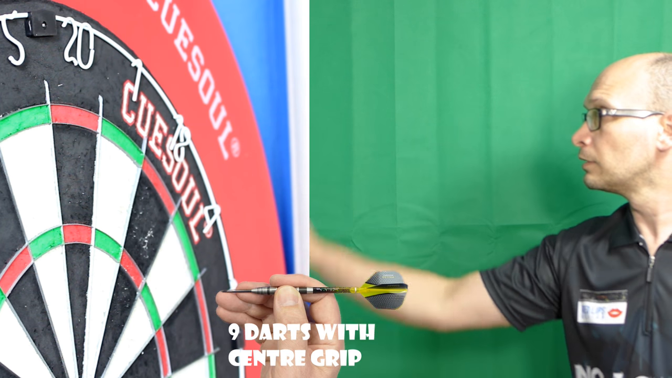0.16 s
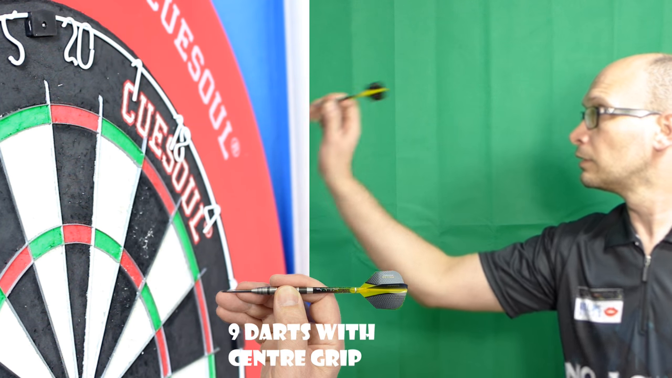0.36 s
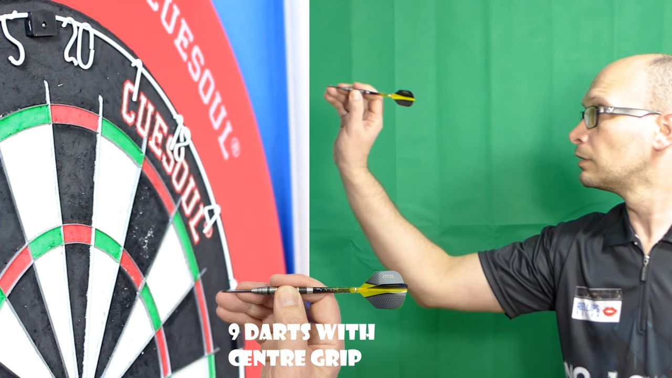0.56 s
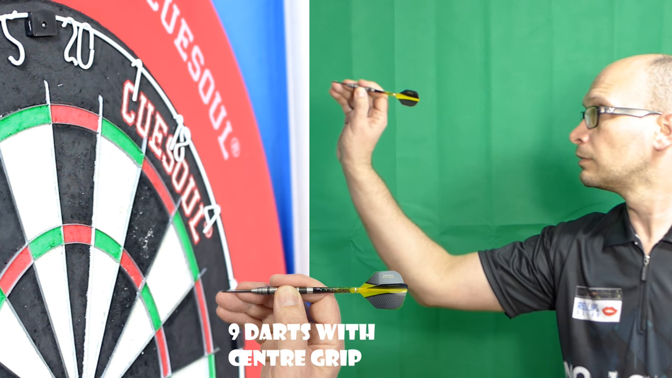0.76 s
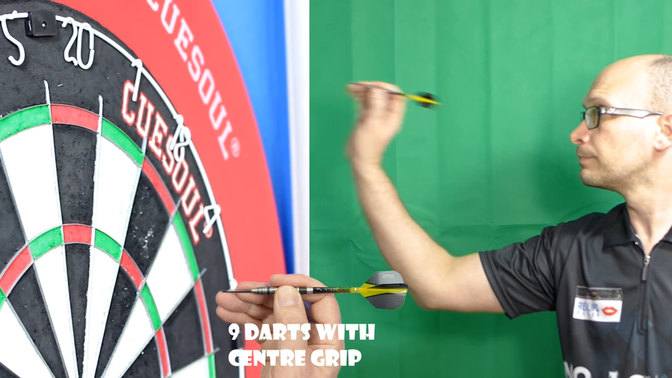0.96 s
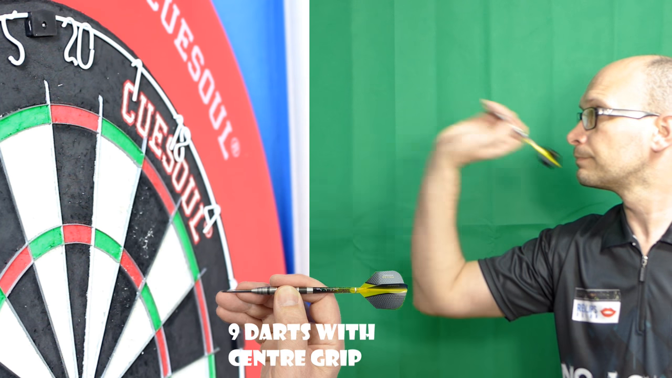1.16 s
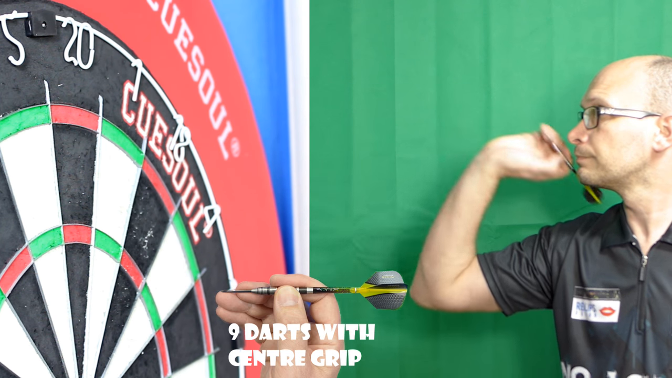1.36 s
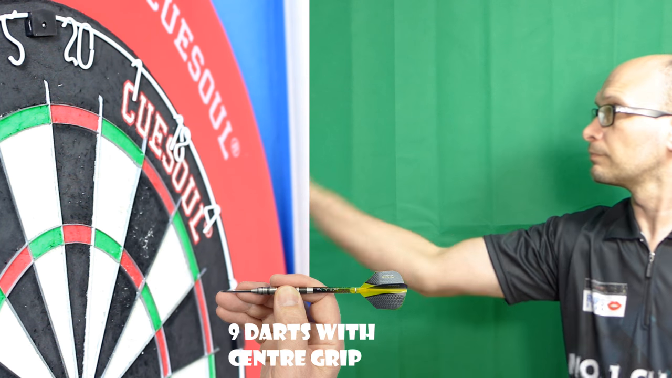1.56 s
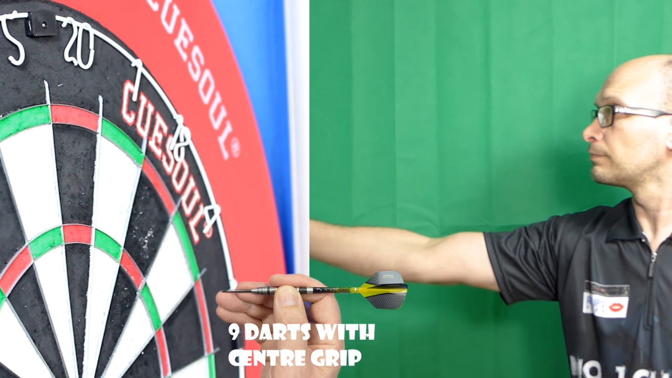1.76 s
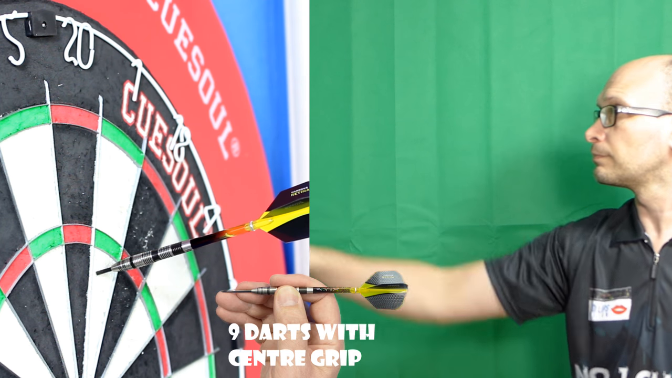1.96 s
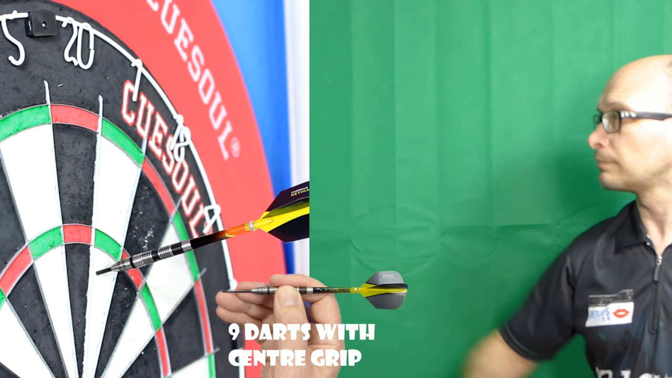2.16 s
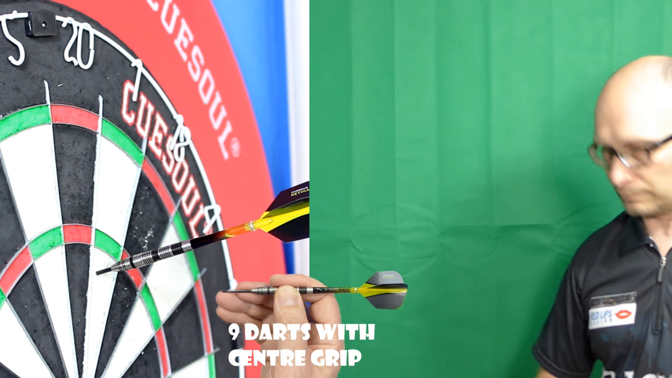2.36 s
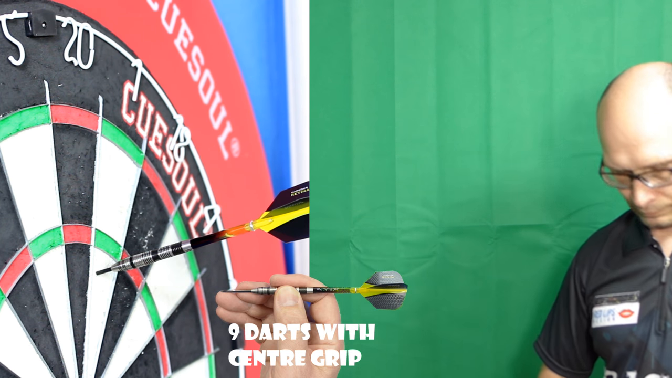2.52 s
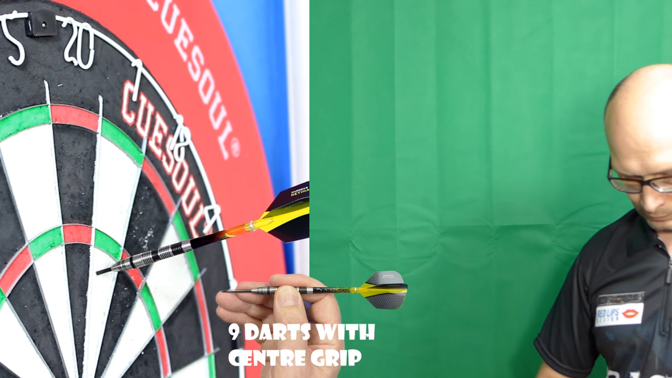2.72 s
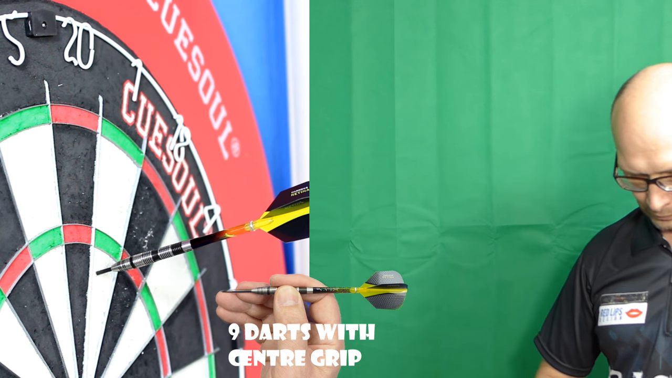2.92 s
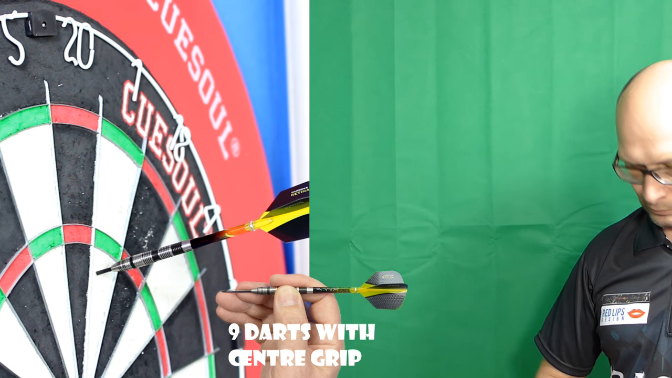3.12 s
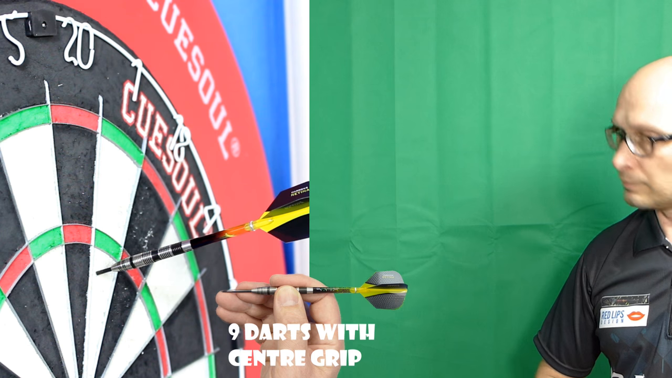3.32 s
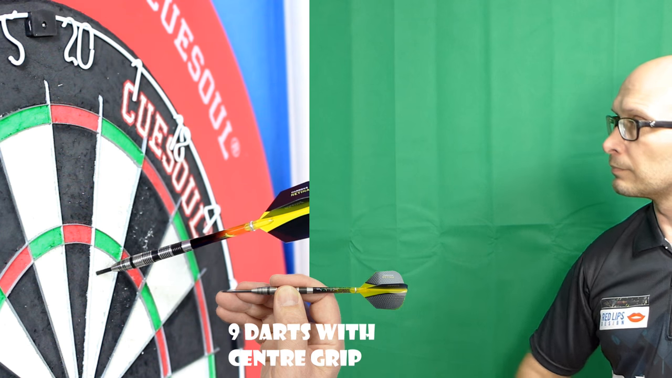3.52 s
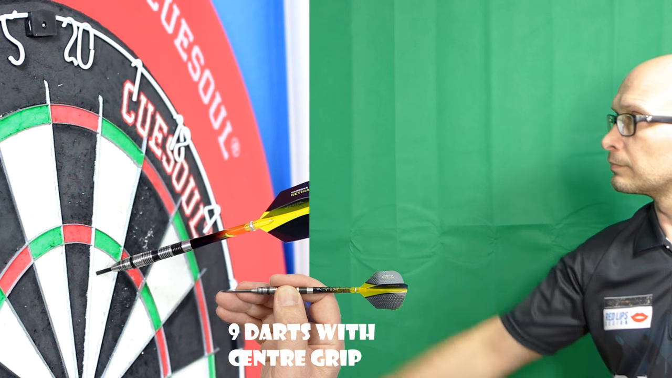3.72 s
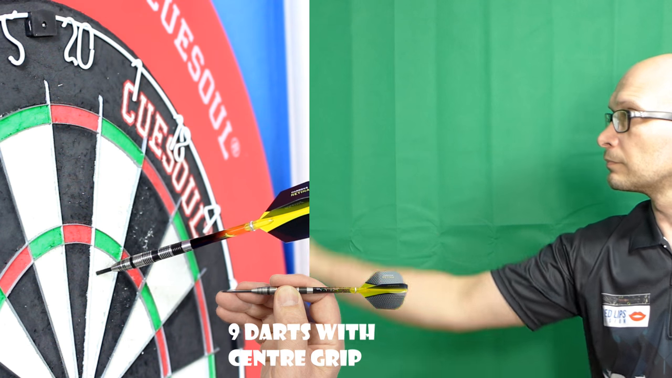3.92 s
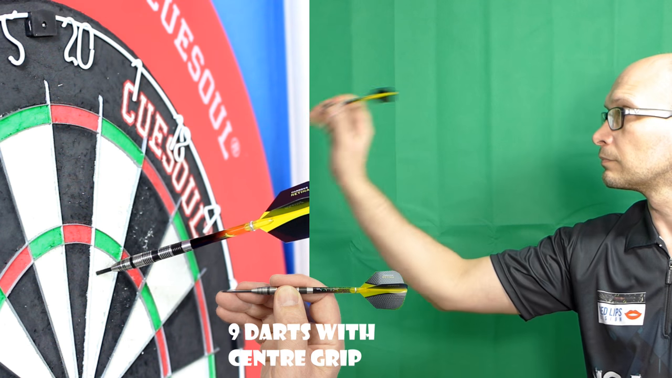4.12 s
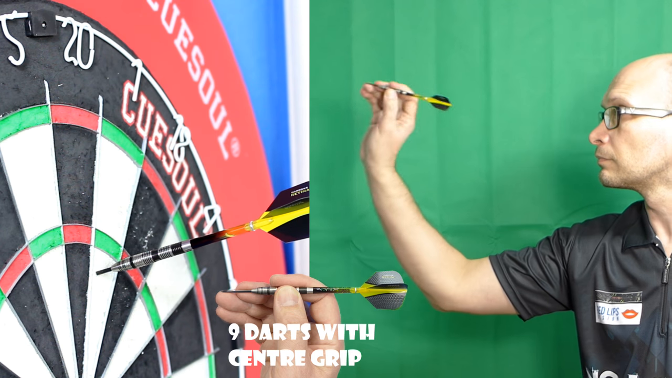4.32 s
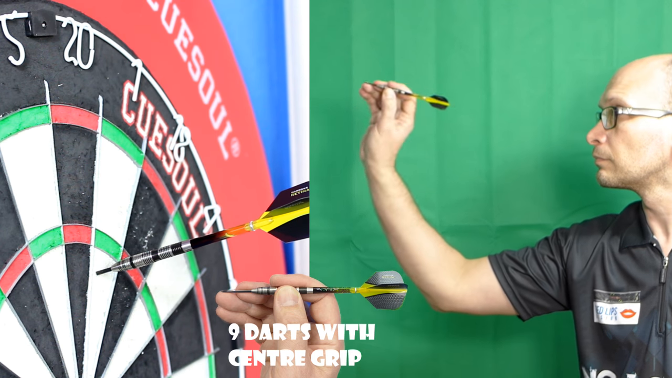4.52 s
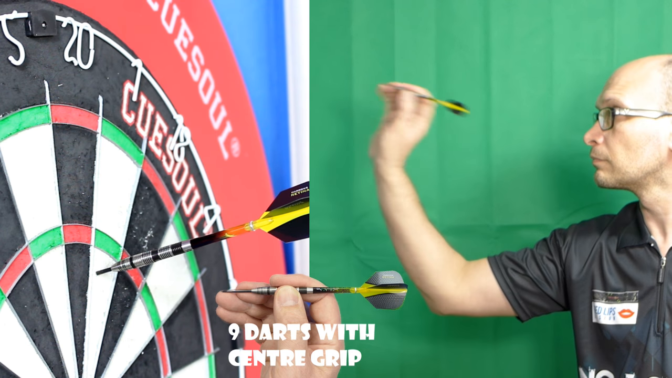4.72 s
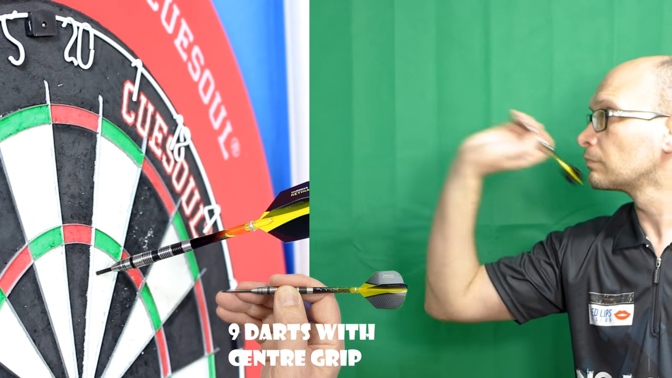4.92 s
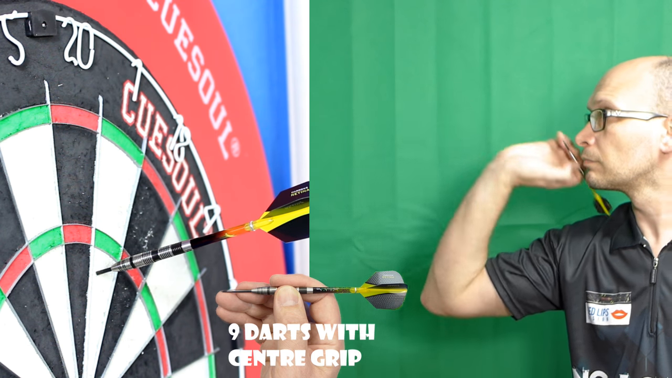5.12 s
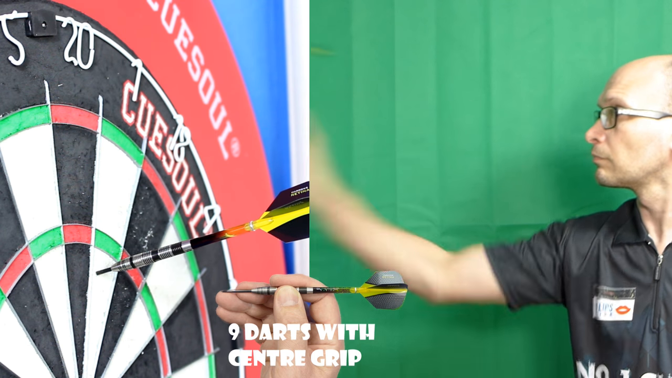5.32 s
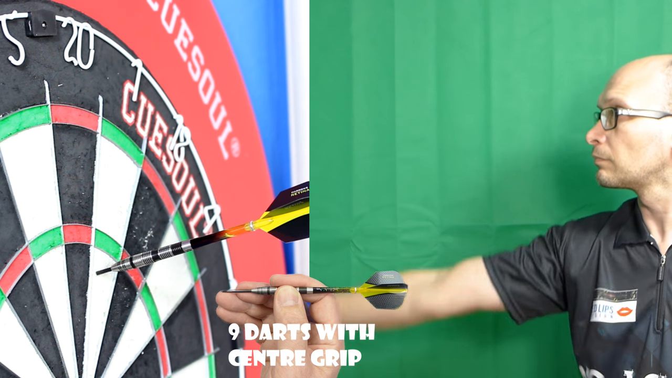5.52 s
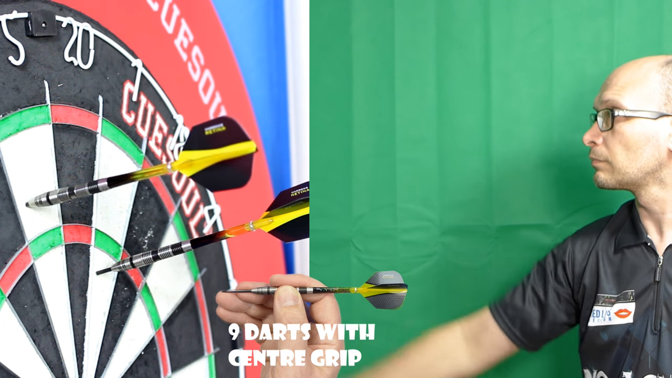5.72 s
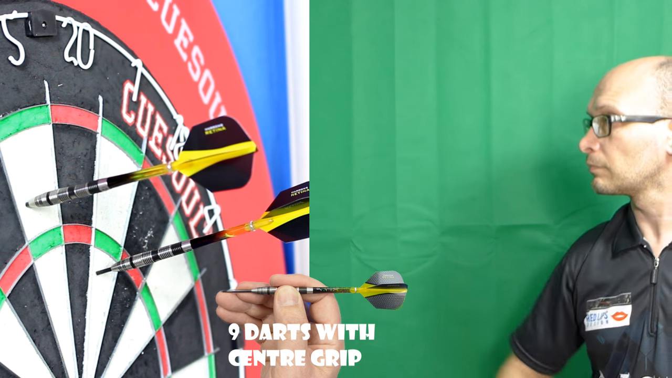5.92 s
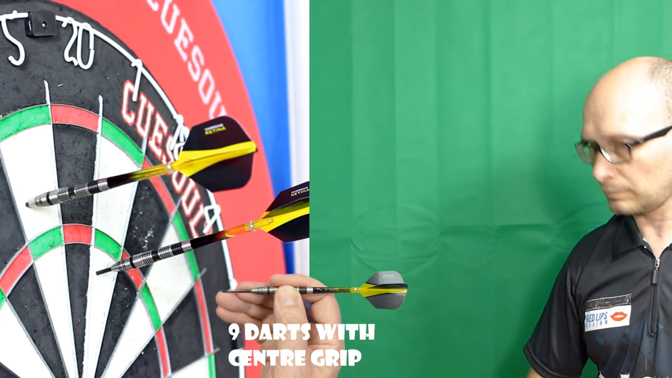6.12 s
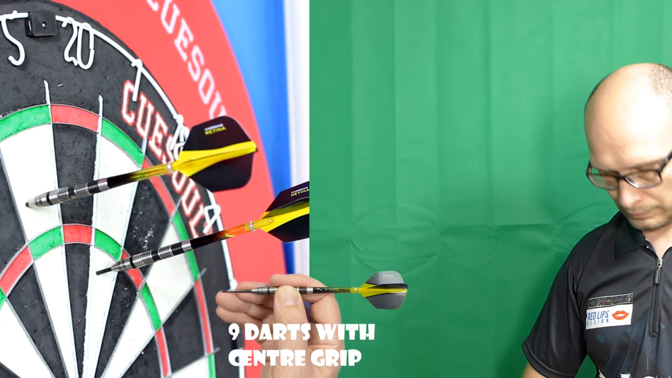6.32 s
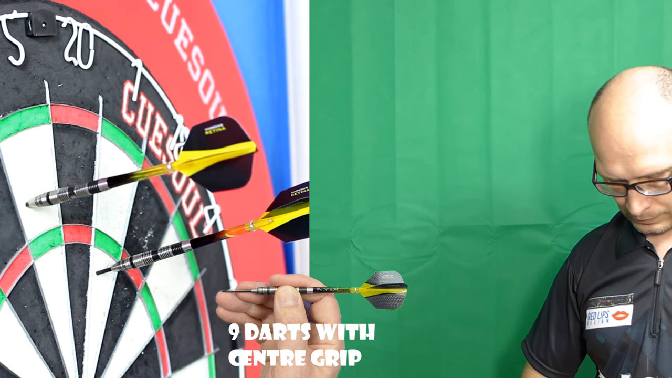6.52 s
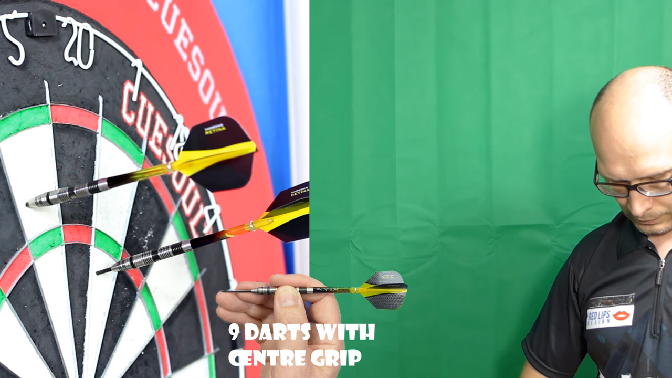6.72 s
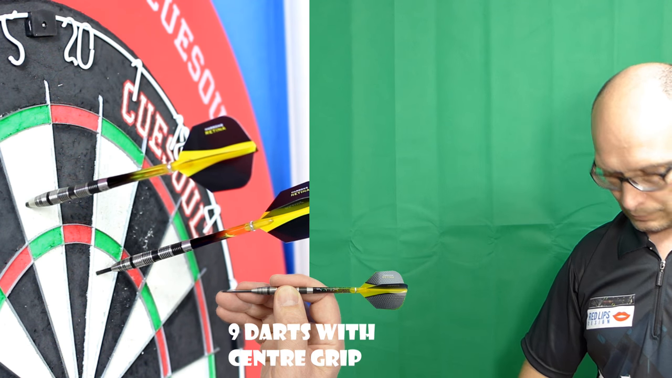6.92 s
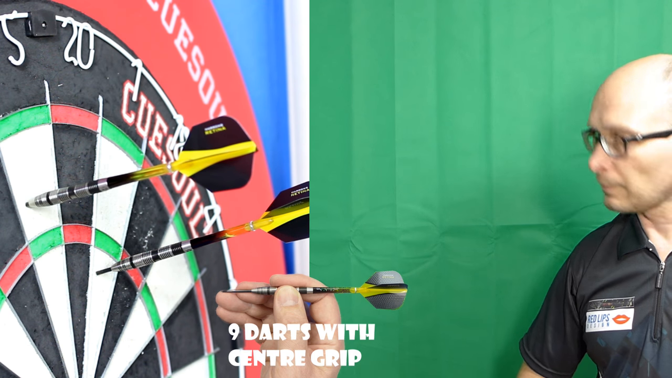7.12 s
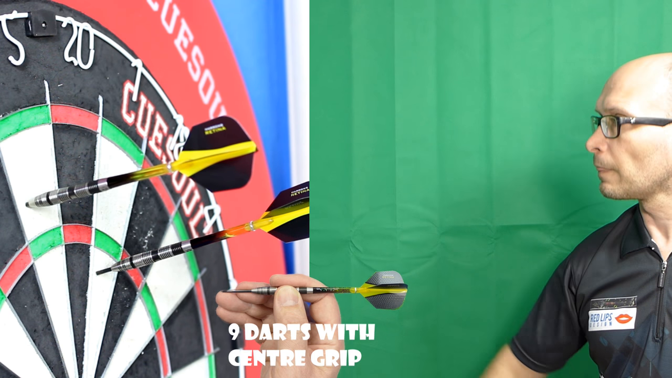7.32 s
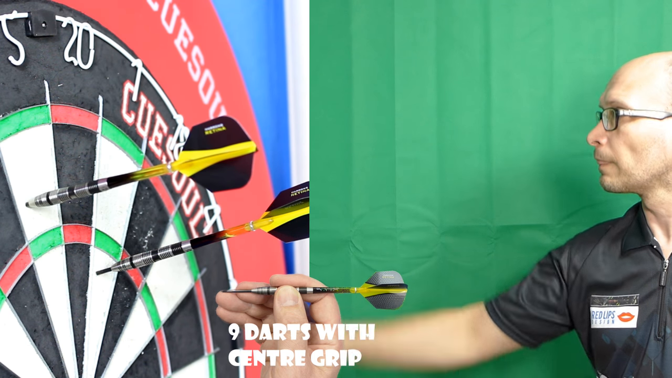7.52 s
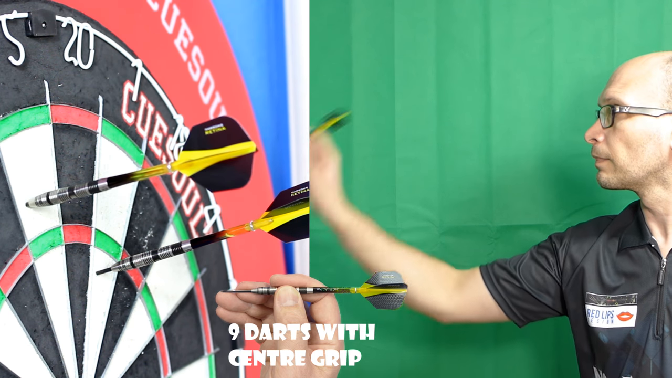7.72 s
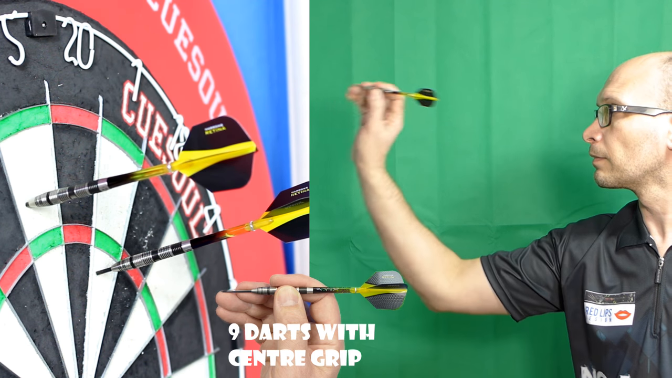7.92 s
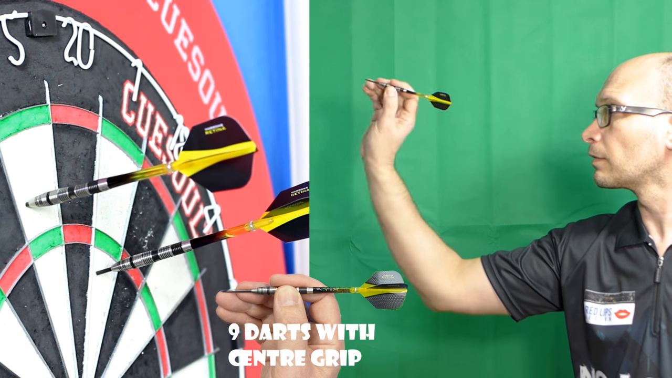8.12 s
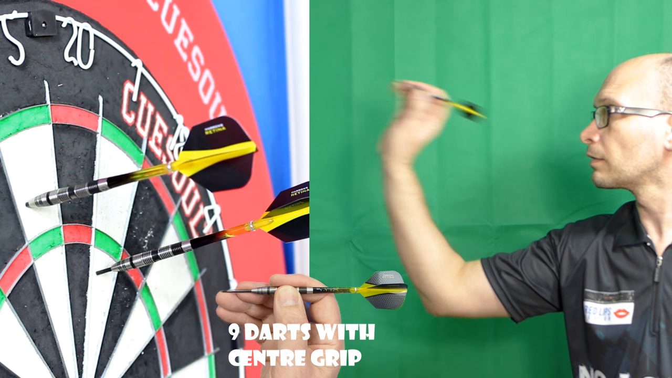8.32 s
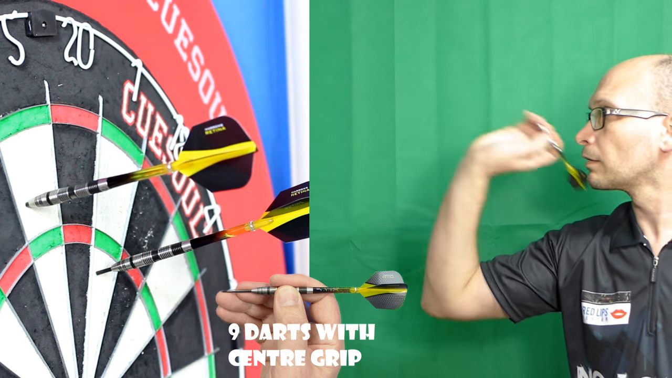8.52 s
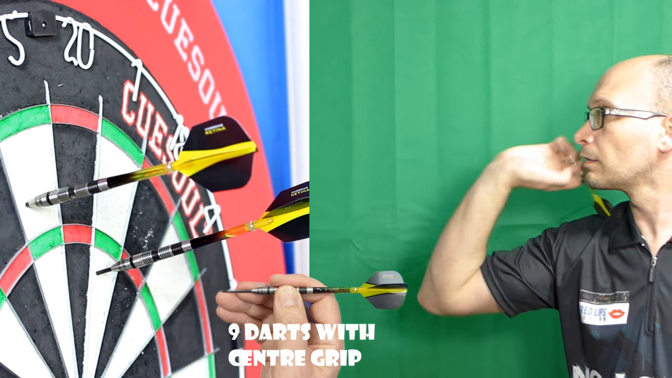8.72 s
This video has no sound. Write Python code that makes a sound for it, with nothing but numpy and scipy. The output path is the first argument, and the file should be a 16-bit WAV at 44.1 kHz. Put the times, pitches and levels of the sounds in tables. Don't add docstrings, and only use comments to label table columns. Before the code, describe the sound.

Close to a stereo camera microphone, cloth rustles gently over steady airy hiss. A dry scratch and sharp flick precede a resonant knock of a dart into a board, with short fluttering reflections off the walls. After quiet shuffling the sequence repeats, the second hit a little louder and brighter. Faint metal clicks and cloth tugs follow, ending on another soft bristly scrape.

```python
import sys
import numpy as np
from scipy import signal
from scipy.fft import rfft, irfft
from scipy.io import wavfile
from scipy.ndimage import uniform_filter1d

SR = 44100
rng = np.random.default_rng(int(sys.argv[2]) if len(sys.argv) > 2 else 0)


def generate_wav(sig):
    pcm = np.round(np.clip(np.atleast_2d(sig).T, -1, 1) * 32767).astype(np.int16)
    wavfile.write(sys.argv[1], SR, pcm)


def amplitude_ratio(level_db):
    exponent = np.asarray(level_db, float) / 20
    return 10 ** exponent


N = 386448
T = np.arange(N) / SR

# (frequency [Hz], level [dB])
ROOM_WIDTH = [(60, -23), (110, -8), (200, -41), (380, -30), (700, -17), (1290, -7), (2380, -9.5),
              (4400, -6), (8120, -5.5), (15000, 1)]


def on_log(hz, table):
    f, v = np.transpose(table)
    return np.interp(np.log(hz + 1), np.log(f + 1), v)


def unit(x):
    return x / np.sqrt(np.mean(x ** 2))


def colour(x, table):
    n = x.shape[-1]
    gain = amplitude_ratio(on_log(np.arange(n // 2 + 1) * SR / n, table))
    return irfft(rfft(x) * gain, n)


def band(x, hz, width_hz, order=2):
    edges = [max(hz - width_hz / 2, 20), min(hz + width_hz / 2, .45 * SR)]
    return signal.sosfilt(signal.butter(order, edges, "bandpass", fs=SR, output="sos"), x)


def walk(rate):
    hold = int(SR / rate)
    levels = np.repeat(rng.standard_normal(N // hold + 1), hold)
    slewed = uniform_filter1d(uniform_filter1d(levels, hold), hold)
    return unit(slewed[:N])


def ring(modes, rise_s, scatter=0):
    t, out = T[:SR], 0
    for (hz, db, t60), turn in zip(modes, scatter * rng.random(len(modes))):
        out = out + amplitude_ratio(db) * np.sin(2 * np.pi * (hz * t + turn)) * 1000. ** (-t / t60)
    return out * (1 - np.exp(-t / rise_s))


def add(out, x, s):
    i = int(s * SR)
    out[..., i:i + x.shape[-1]] += x[..., :N - i]


def darts(hall):
    # (time [s], blow level [dB], fibre crack level [dB], left minus right [dB], brightness [dB])
    landings = [
        (1.879, -14, -39, .5, 2),
        (5.671, -11, -41.5, 0.5, 5.5),
    ]
    # (frequency [Hz], level [dB], t60 [s])
    first_spot = [(280, -23, 0.27), (351, -5, 0.62), (464, -2.5, 0.35), (510.5, 3.5, 0.21),
                  (580, 1.5, 0.25), (619, -16, 0.46), (790, -12, 0.37), (880, -14, 0.55), (981, -17, 0.64),
                  (960, -30, 0.43), (1220, -47, 0.54), (1310, -39, 0.26), (1565, -19, 0.4),
                  (1670, -25, 0.4), (1897, -13.5, 0.15), (2020, -27, 0.62), (2078, -40, 0.84),
                  (2340, -49, 0.56)]
    # (frequency [Hz], level [dB], t60 [s])
    second_spot = [(348.5, -10.5, 0.82), (497.5, -8, 0.5), (551, -7.5, 0.54), (590, -2.5, 0.35),
                   (717, -4.5, 0.43), (920, -55, 5.0), (1083, -19, 0.36), (1180, -31, 0.19),
                   (1330, -21.5, 0.45), (1603, -18, 0.18), (1524, -25, 0.41), (1720, -27, 0.43),
                   (1900, -33, 0.62), (2030, -28, 0.35), (2055, -25, 0.47), (2070, -12.5, 0.1),
                   (2200, -27, 0.33), (2510, -36, 0.28)]
    # (frequency [Hz], level [dB], t60 [s])
    panel_modes = [(326.5, -4, 0.49), (355, -10, 0.48), (384.6, -8, 0.54), (403.5, -2, 0.24),
                   (458.4, -2, 0.32), (561, 4.5, 0.24), (770, -13, 0.36), (870, -12, 0.31),
                   (1011, -18, 0.54), (1130, -19, 0.36)]
    # (frequency [Hz], level [dB], t60 [s])
    wall_modes = [(30, -50, 0.53), (60, -46, 0.32), (117.7, -48, 0.37), (166, -40.5, 0.31),
                  (193, -39.5, 0.33), (226.4, -34, 0.25), (263, -33.5, 0.34)]
    small_board_hz = 312
    body_top_hz = 1170

    out, shape, wash = np.zeros((2, N)), arrivals(), thud_wash(hall)
    panel = ring(panel_modes, 0.00032, scatter=0.96)
    small = signal.ellip(5, 1, 40, small_board_hz, "highpass", fs=SR, output="sos")
    low = signal.butter(4, body_top_hz, "lowpass", fs=SR, output="sos")
    high = signal.butter(4, body_top_hz, "highpass", fs=SR, output="sos")
    for (s, db, crack_db, pan_db, bright_db), spot in zip(landings, (first_spot, second_spot)):
        mid = amplitude_ratio(-12.0) * (panel + ring(spot, 0.0004, scatter=1.0))
        side = (amplitude_ratio(pan_db) - 1) / 2 * mid + amplitude_ratio(-5.0) * colour(np.roll(mid, 30), ROOM_WIDTH)
        blow = np.array([mid, side]) + amplitude_ratio(-3.5) * wash
        body = signal.sosfilt(low, blow)
        power = np.abs(signal.hilbert(body[0])) ** 2
        power = uniform_filter1d(uniform_filter1d(power, size=130), size=130)
        body *= shape / np.sqrt(power + 1e-12)
        treble = signal.sosfilt(high, blow)
        treble = amplitude_ratio(4) * treble + (amplitude_ratio(bright_db) - amplitude_ratio(2.5)) * band(treble, 1900, 1800)
        boom = 4 * ring(wall_modes, 0.0085, scatter=0.92) * [[1], [.08]]
        add(out, amplitude_ratio(db) * (signal.sosfilt(small, body) + treble + boom), s)
        add(out, amplitude_ratio(crack_db) * fibre_crack(), s - .004)
    return out


def arrivals():
    # (delay [s], level [dB])
    echoes = [(.004, -4.5), (0.013, -4), (0.028, -2), (.046, -3.5), (.065, -1.5), (.084, -6.5), (.104, -12),
              (0.143, -13), (.208, -27)]
    bunch_s = 0.0024
    trip_s, first_db, loss_db = .0183, 1.1, 2.5

    t = T[:SR]
    flutter = [((k + 1) * trip_s, first_db - k * loss_db) for k in range(13)]
    bunches = sum(amplitude_ratio(2 * db) * np.exp(-((t - delay) / bunch_s) ** 2) for delay, db in echoes + flutter)
    tail = amplitude_ratio(-14.0) * 1000. ** (-2 * t / 0.5)
    return np.sqrt(bunches + tail) * (1 - np.exp(-t / 0.00041))


def thud_wash(hall):
    # (frequency [Hz], level [dB per Hz])
    thud = [(200, -28), (310, -5.5), (350, -3.5), (435, -6.5), (490, -1.5), (650, -12.5), (730, -2),
            (1100, -13.5), (1290, -25.5), (1980, -20.5), (2900, -40), (4900, -36.5), (11000, -49),
            (15500, -75)]
    pulse = irfft(amplitude_ratio(on_log(np.arange(1025) * SR / 2048, thud)))
    pulse = np.roll(pulse, 512)[None, :1024]
    wash = signal.fftconvolve(hall, pulse)[:, 512:SR + 512]
    return wash / np.abs(wash[0]).max()


def fibre_crack():
    t = T[:SR]
    fibres = unit(band(rng.standard_normal((2, SR)), 7400, 10000, order=4)) * [[1], [.5]]
    return fibres * np.exp(-t / 0.024) * (1 - np.exp(-t / 0.0025))


def flight():
    hollow, air = (2047, 240), (8800, 5200)
    scratch_width_hz = 1170

    db, hollow_db, air_db, hz = strokes()
    rasp = amplitude_ratio(-14.0) * unit(band(rng.standard_normal(N), 2440, 4260))
    body = amplitude_ratio(hollow_db) * unit(band(grains(), *hollow))
    body = body + amplitude_ratio(air_db) * unit(band(grains(), *air))
    narrow = signal.butter(2, scratch_width_hz / 2, fs=SR, output="sos")
    turn = 2 * np.pi * np.cumsum(uniform_filter1d(hz, size=900)) / SR
    scratch = signal.sosfilt(narrow, grains()) * np.cos(turn)
    scratch = scratch + signal.sosfilt(narrow, grains()) * np.sin(turn)
    return amplitude_ratio(db) * (unit(scratch) + body + rasp)


def strokes():
    # (time [s], peak level [dB], rise [s], hollow level [dB], air level [dB])
    draws = [
        (1.324, -45, 0.049, -22, -1),
        (5.027, -51, 0.0089, -12, 5.5),
        (8.612, -49, 0.049, -18, 1.5),
    ]
    # (time [s], peak level [dB], rise [s], hollow level [dB], air level [dB])
    flicks = [
        (1.512, -45, 0.0045, -14, 0),
        (5.104, -49, 0.0029, -4.5, 1),
        (5.298, -39.5, 0.0022, -8.5, 1),
    ]
    draw_s, flick_s = .082, 0.02
    air_fade_db_s, hollow_gain_db_s = 72, 52
    scratch_hz, bend_hz_per_db = 5390, 12
    snap_db, snap_s = 4.5, 0.0086

    rows = [(*r, draw_s) for r in draws] + [(*r, flick_s) for r in flicks]
    levels = np.array([stroke(s, peak_db, rise, contact) for s, peak_db, rise, _, _, contact in rows])
    s, _, _, hollow_db, air_db, _ = np.array(rows)[levels.argmax(axis=0)].T
    db = levels.max(axis=0)
    age = np.clip(T - s, 0, .16)
    hz = scratch_hz + bend_hz_per_db * np.clip(db + 45, -25, 10)
    hollow_db = hollow_db + hollow_gain_db_s * age
    air_db = air_db - air_fade_db_s * age + snap_db * np.exp(-age / snap_s)
    return db, hollow_db, air_db, hz


def stroke(s, db, rise_s, contact_s):
    touch_db, release_db_s = -12, 230
    free = s + contact_s
    times = [s - .004, s, s + min(rise_s, contact_s), free, free + .3]
    levels = [-120, db + touch_db, db, db, db - .3 * release_db_s]
    return np.interp(T, times, levels, right=-120)


def grains():
    size_db = 2.1 * np.minimum(rng.exponential(size=N), 5)
    return rng.standard_normal(N) * amplitude_ratio(size_db + 2.3 * walk(150))


def ticks():
    # (time [s], peak level [dB], frequency [Hz])
    clicks = [(1.519, -25.5, 6350), (3.9994, -46, 4620), (4.3774, -43, 4930), (5.1063, -29, 8090),
              (5.3265, -23, 5530), (6.538, -40.5, 4960), (7.3494, -44, 8440), (7.4172, -34, 4840)]
    out, t = np.zeros(N), T[:2048]
    envelope = np.exp(-t / 0.0033) * (1 - np.exp(-t / 0.00078))
    for s, db, hz in clicks:
        crackle = unit(band(rng.standard_normal(2048), hz, 0.41 * hz))
        add(out, amplitude_ratio(db - 10.0) * crackle * envelope, s)
    return out


def shirt():
    # (time of the peak [s], body level [dB], rise [s], fall [s], sheen level [dB])
    rustles = [
        (.27, -65.5, 1.1, 0.37, 0),
        (1.64, -60, .05, 0.33, -3),
        (2.48, -70, 0.22, 0.29, -10),
        (4.07, -75.5, 0.3, 0.37, 3),
        (5.42, -60, .1, .3, -4),
        (6.94, -74, 0.13, 0.24, -13),
        (7.68, -73.5, 0.046, .2, 0),
        (7.87, -62.5, .06, 0.12, -3),
    ]
    rest_db, rest_sheen_db = -78.5, -5

    body = unit(band(rng.standard_normal(N), 1300, 1940))
    sheen = unit(band(rng.standard_normal(N), 5200, 2600))
    out = amplitude_ratio(rest_db + 2.1 * walk(4.08)) * (body + amplitude_ratio(rest_sheen_db) * sheen)
    for s, db, rise_s, fall_s, sheen_db in rustles:
        away = np.maximum((s - T) / rise_s, (T - s) / fall_s)
        out = out + amplitude_ratio(db - 20 * away) * (body + amplitude_ratio(sheen_db) * sheen)
    return amplitude_ratio(0.94 * walk(25)) * out


def shoes():
    # (time [s], peak level [dB], frequency [Hz])
    steps = [(.77, -55, 510), (2.35, -48, 558), (2.46, -45.5, 305), (2.5, -51, 220), (3.52, -54, 131),
             (3.6, -50, 550), (7.03, -59, 182), (8.54, -60, 496)]
    return knocks(steps, 0.12, 1.3)


def arm_swings():
    # (time [s], level [dB], frequency [Hz])
    swings = [
        (1.36, -59, 79.6),
        (1.5, -58, 90.6),
        (5.05, -60, 89),
        (5.29, -59.5, 90),
        (8.6, -62, 60),
    ]
    return knocks(swings, 0.22, 3.1)


def knocks(events, t60, width):
    out = np.zeros(N)
    for s, db, hz in events:
        modes = [(hz * width ** k, db - 3 * abs(k), t60) for k in (-1, 0, 1)]
        add(out, 0.71 * ring(modes, t60 / 15), s)
    return out


def room():
    # (frequency [Hz], t60 [s])
    decay = [(60, 0.37), (250, 0.73), (500, 0.41), (1000, 0.44), (2000, 0.44), (5000, 0.48), (12000, 0.41)]
    t, out = T[:SR], 0
    for hz in 40 * 2 ** np.arange(0, 9, .5):
        noise = band(rng.standard_normal((2, SR)), hz, hz * .35)
        out = out + noise * 1000. ** (-t / on_log(hz, decay)) * (1 - np.exp(-t / 0.0026))
    out[1] = colour(out[1], ROOM_WIDTH)
    return out / np.sqrt(np.sum(out[0] ** 2))


def background():
    # (frequency [Hz], level [dB per Hz])
    air_mid = [(120, -23), (200, 3.5), (310, -1.5), (358, 0), (471, 0), (526, 2.5), (619, -4), (959, -4),
               (1150, -6.5), (2430, -13.5), (3250, -16.5), (4860, -11), (13500, -16), (15600, -27)]
    # (frequency [Hz], level [dB per Hz])
    air_side = [(15, -55), (25, -25), (53, -33), (89, -24), (126, -10.5), (323, -2.5), (379, -3), (923, 2),
                (1620, -3.5), (2860, -14.5), (4770, -14), (14400, -25), (15600, -32)]
    # (time [s], level [dB])
    hum = [(0.0, -67), (.4, -76), (1.0, -64.5), (1.2, -64.5), (1.65, -62.5), (2.4, -64), (2.8, -71),
           (3.2, -78), (3.6, -63.5), (3.85, -77), (4.1, -60), (4.5, -78), (5.5, -65.5), (6.1, -68),
           (6.65, -80.5), (7.6, -66.5), (8.2, -75.5), (8.76, -70)]
    # (frequency [Hz], width [Hz])
    fan_bands = [(562.4, 55), (222, 230)]
    motor_db = -75
    whine_hz, whine_db = 15625, -89

    mid = amplitude_ratio(-61 + 0.4 * walk(3.06)) * unit(colour(rng.standard_normal(N), air_mid))
    mid = mid + amplitude_ratio(-74.0) * unit(band(rng.standard_normal(N), 57, 225))
    side = amplitude_ratio(-57.5) * unit(colour(rng.standard_normal(N), air_side))
    levels = np.interp(T, *np.transpose(hum)), motor_db
    for (hz, width_hz), db in zip(fan_bands, levels):
        mid = mid + amplitude_ratio(db + 2.0 * walk(3.9)) * unit(band(rng.standard_normal(N), hz, width_hz))
    whine = np.sqrt(2) * amplitude_ratio(whine_db) * np.sin(2 * np.pi * whine_hz * T)
    return np.array([mid + whine, side])


def scene():
    hall = room()
    near = amplitude_ratio(-1.5) * flight() + shirt() + shoes() + arm_swings()
    near_side = -.2 * near + 0.074 * np.roll(near, 9)
    direct = np.array([near, near_side]) + ticks() * [[1], [.3]]
    reverb = amplitude_ratio(-8.5) * signal.fftconvolve(near[None], hall)[:, :N]
    mid, side = direct + reverb + darts(hall) + background()
    return np.array([mid + side, mid - side])


def roll_off(x):
    return signal.sosfilt(signal.butter(12, 16150, fs=SR, output="sos"), x)


def record(dry):
    top_hz, offset = 15720, -.00295
    top = signal.ellip(10, .2, 70, top_hz, fs=SR, output="sos")
    mix = signal.sosfilt(top, dry) + offset
    return roll_off(mix)


dry = scene()
out = record(dry)
generate_wav(out)
```